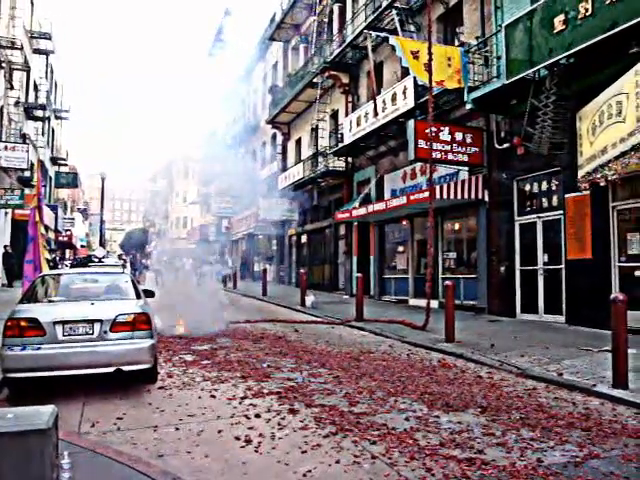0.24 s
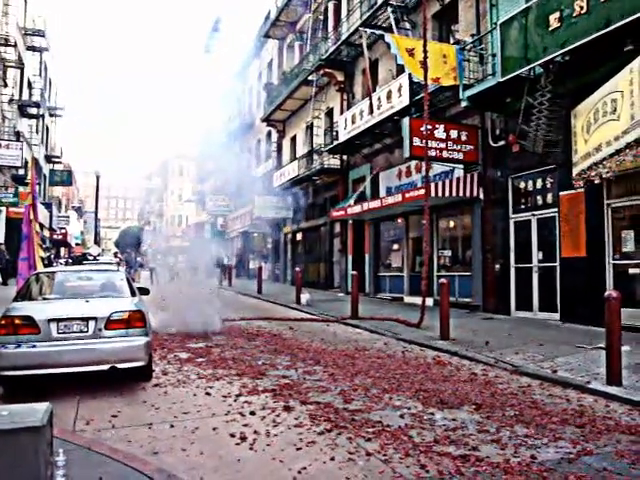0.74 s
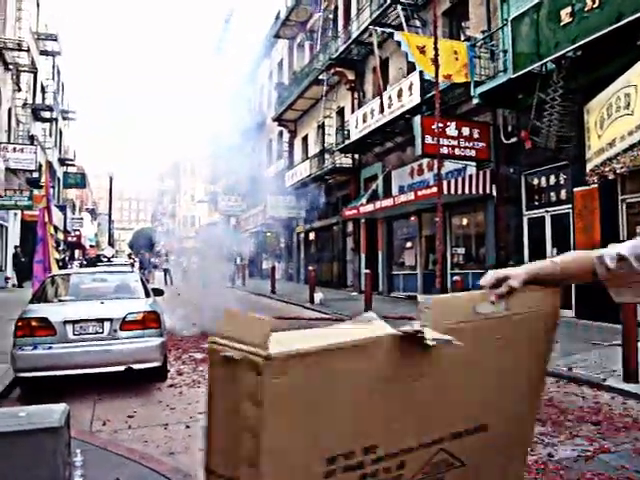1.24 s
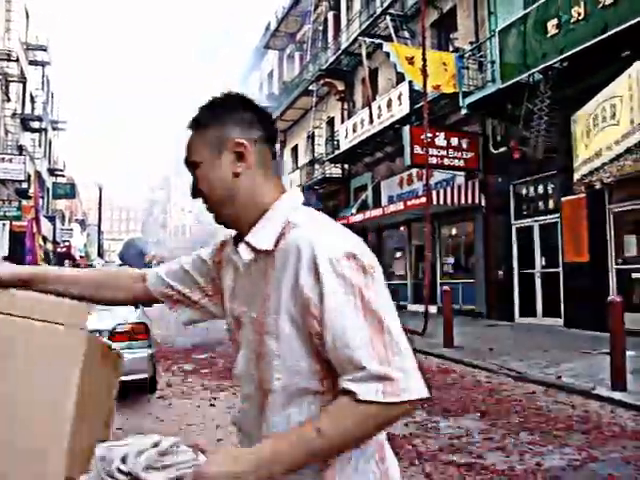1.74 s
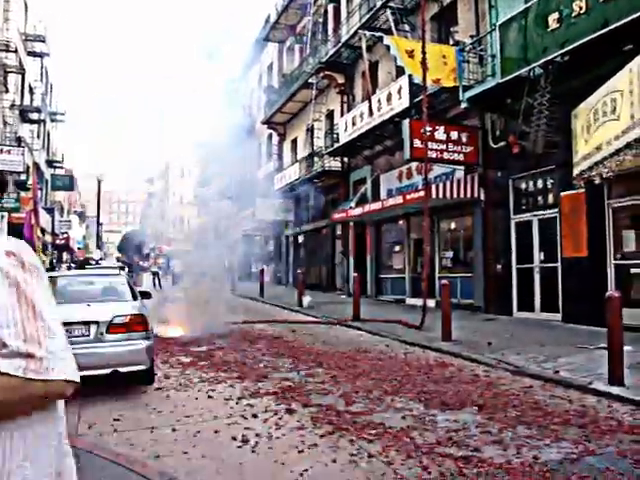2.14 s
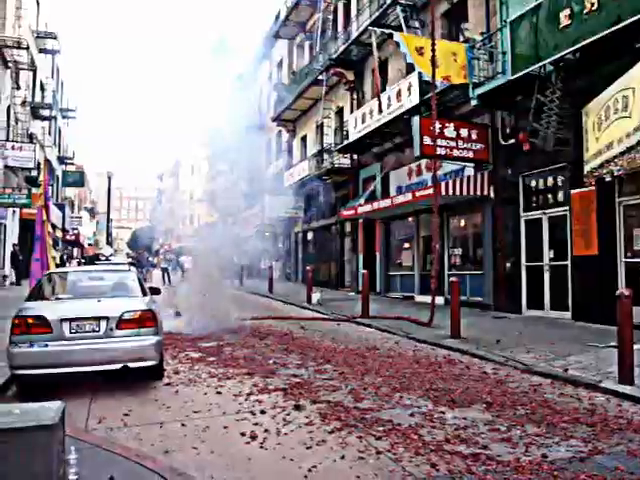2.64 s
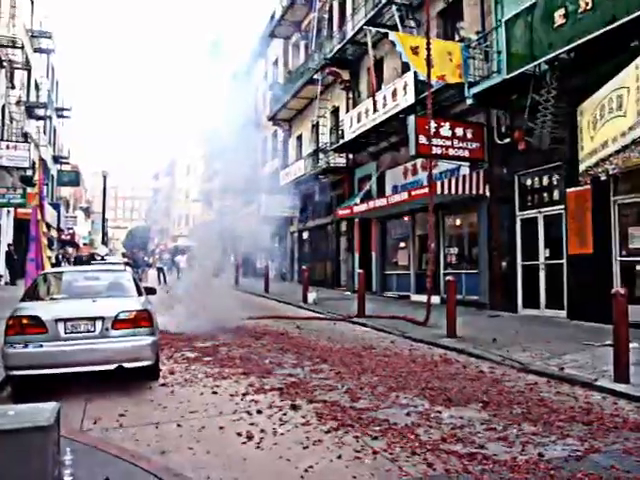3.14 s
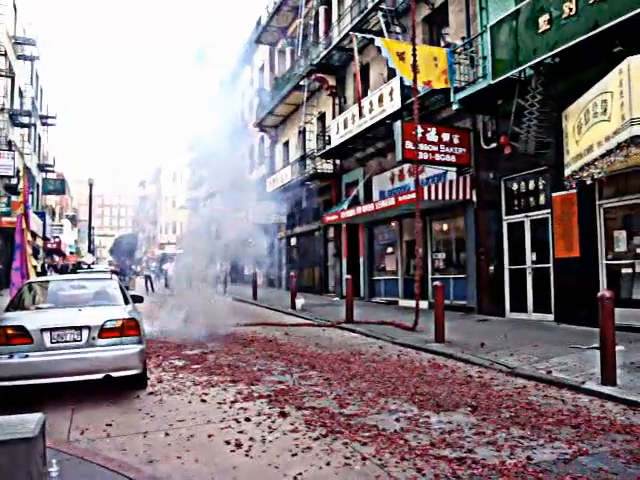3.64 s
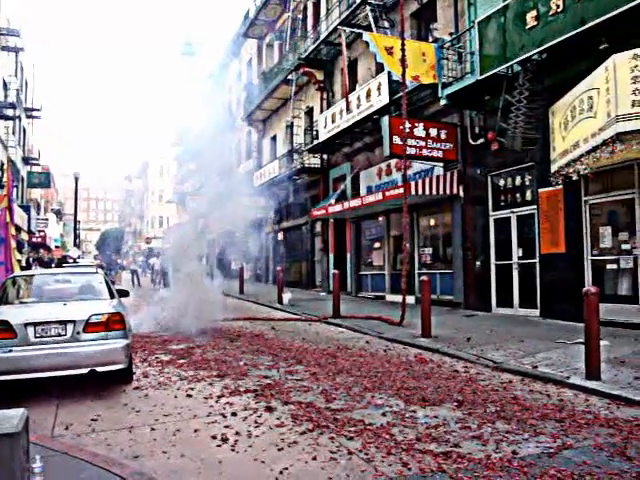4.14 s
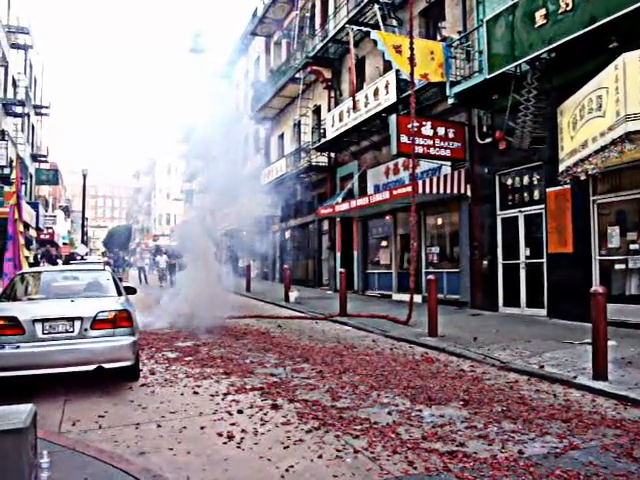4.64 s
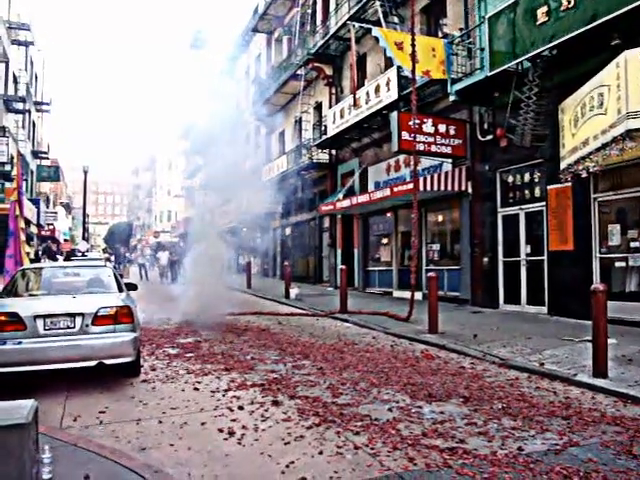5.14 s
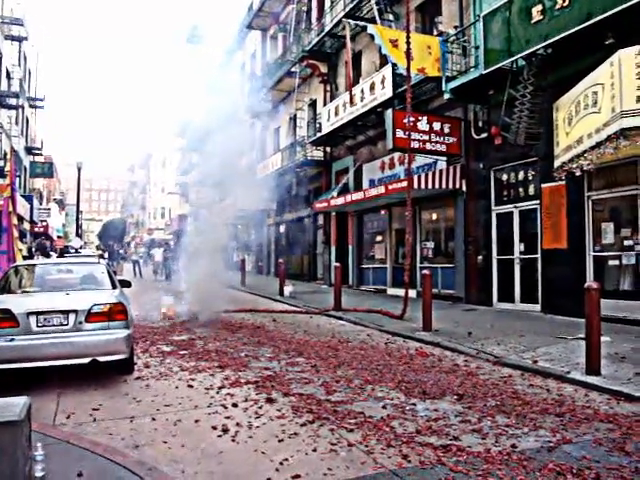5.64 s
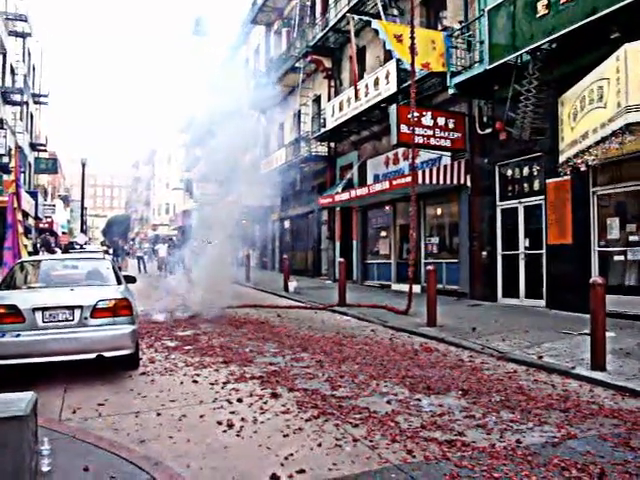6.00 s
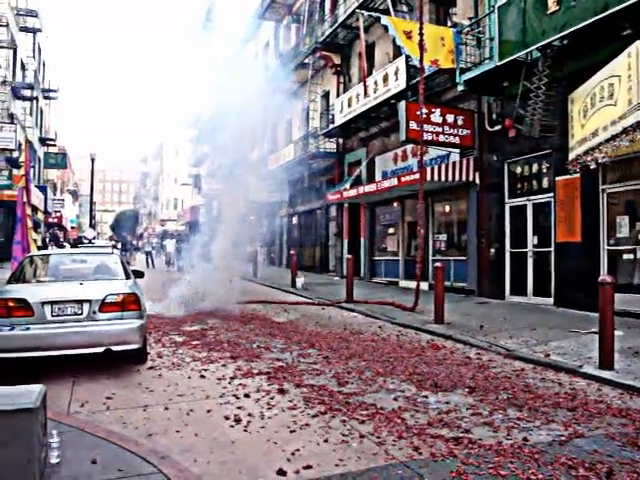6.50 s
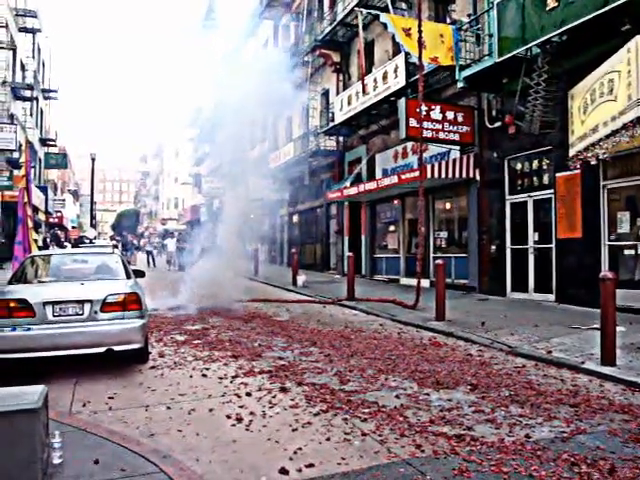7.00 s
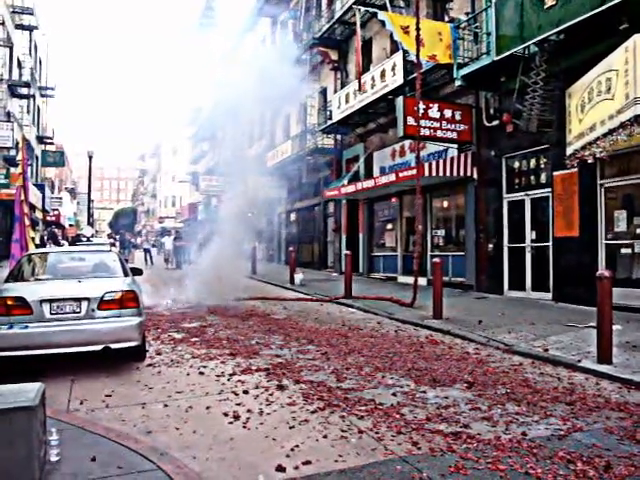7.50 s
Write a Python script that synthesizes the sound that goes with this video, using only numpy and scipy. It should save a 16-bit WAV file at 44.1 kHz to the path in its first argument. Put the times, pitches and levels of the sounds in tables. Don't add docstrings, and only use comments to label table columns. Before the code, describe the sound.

A long string of firecrackers is already burning on a narrow street lined with tall fronts. Sharp cracks and heavier bangs come in fast, uneven flurries, each slapped back by ground and walls and blending into a long ringing roar. Later the bursts separate slightly, letting the echo fall away before the next bang. Faint distant traffic hums behind. A small camera microphone sounds thin in the bass, squashed and clipped on the peaks.

```python
import sys
import numpy as np
from scipy import signal
from scipy.fft import rfft, irfft, next_fast_len
from scipy.io import wavfile
from scipy.ndimage import minimum_filter1d, map_coordinates

SR = 44100
rng = np.random.default_rng(int(sys.argv[2]) if len(sys.argv) > 2 else 0)


def dump(signal):
    limited = np.clip(np.atleast_2d(signal).T, -1, 1)
    pcm = np.round(limited * 32767).astype(np.int16)
    wavfile.write(sys.argv[1], SR, pcm)


def attenuation_scalar(level_db):
    decades = np.asarray(level_db, float) / 20
    return 10 ** decades


N = 342216
LEAD = SR

# [start t/s, end t/s, opening shock level/dB, opening charge level/dB, small crackers' charge level/dB]
FLURRIES = [(.0053, .33, 6, -9, -19.5), (0.419, 0.906, 4, -16, -20), (1.031, 1.05, 3.5, -7.5, -33),
            (1.2128, 1.4, 4, -10, -20.5), (1.6415, 2.09, 4, -14, -17), (2.1556, 2.475, -7, -11.5, -19),
            (2.5393, 2.92, 6, -6.5, -24.5), (3.0452, 3.076, -3, -11.5, -26), (3.1492, 3.39, 0, -9, -22.5),
            (3.453, 3.84, -4.5, -19, -22), (3.9106, 4.03, 7.5, -14, -32), (4.1484, 4.27, 10, -9.5, -37),
            (4.396, 4.42, 2.5, -8, -22.5), (4.7633, 4.9, 3, -6, -19.5), (5.352, 5.419, 8.5, -3, -27),
            (5.467, 5.61, 11, -26.5, -26.5), (5.725, 5.81, 1, -6.5, -16), (5.8839, 6.07, 5.5, -6, -17),
            (6.363, 6.595, -0.5, -14.5, -19.5), (6.671, 6.77, -11, -13.5, -21),
            (7.0342, 7.08, 5.5, -11, -31.5), (7.1924, 7.29, 4, -4.5, -28), (7.3952, 7.43, 9.5, -13, -24),
            (7.5576, 7.76, 7, -14.5, -28.5)]
# [t/s, shock level/dB, charge level/dB]
HEAVY_CRACKERS = [(0.1874, 4, -11.5), (0.504, -5, -8.5), (.5356, -9, -9), (0.733, -21, -13.5),
                  (0.8308, 10, -11), (1.3172, 4.5, -14), (1.4524, 4.5, -9.5), (1.6882, 7, -10.5),
                  (1.8846, -10, -9.5), (1.9641, -3, -12), (2.062, -13.5, -10), (2.4291, -1, -13),
                  (2.6737, -4, -15.5), (2.8205, 1, -17.5), (3.3645, 7, -13.5), (3.3795, -5.5, -9.5),
                  (3.5445, -1, -11), (3.641, -4, -6), (3.7954, 3.5, -10.5), (3.9733, 3.5, -11),
                  (4.2241, 5.5, -13), (4.7761, -1.5, -17), (6.155, -9, -11), (6.223, -10.5, -5),
                  (6.4086, -11, -11), (6.5935, -6, -13.5), (6.7436, 3, -15.5), (7.2017, 10, -20),
                  (7.5655, 8, -8), (7.6862, 0, -7)]
# [t/s, shock level/dB, charge level/dB]
SHARP_CRACKERS = [(0.094, 2.5, -13), (0.2504, 4.5, -20), (.3548, -7, -20), (0.4439, -3, -13),
                  (0.6674, 7.5, -17.5), (1.256, 0, -26), (1.7886, 4.5, -14), (2.323, 6.5, -17),
                  (2.3814, 6, -20.5), (2.6988, 2, -19.5), (2.7676, 3, -18.5), (2.8843, 3.5, -10.5),
                  (3.077, -7.5, -34), (3.2229, 2.5, -12.5), (3.3227, 0.5, -12), (3.4858, -2, -11.5),
                  (3.5936, 1, -26), (4.0539, 6, -13), (4.2659, 2.5, -16.5), (4.8515, 1, -15.5),
                  (5.4777, 3, -8), (5.5124, -7, -35), (5.5562, 10, -10), (5.8294, 1, -20.5),
                  (6.4898, 4.5, -16), (6.5213, -3, -23), (7.2735, 10, -19), (7.4377, -4, -23.5),
                  (7.6193, 4.5, -20), (7.6567, 5.5, -18)]
# [delay t/s, level/dB]
WALLS = [
    (.0022, -16),
    (.0097, -8),
    (.0178, -3),
    (.0214, -5),
    (.0247, -2.5),
    (.027, -8),
    (.031, -5),
    (.0375, -8),
    (.043, -18.5),
]
# [f/Hz, level per Hz/dB]
ROAR_TONE = [(24, -63), (40, -48), (101, -30.5), (321, -18), (387, -8), (523, -3), (690, -4), (890, 0.5),
             (1290, 2), (2410, -1), (5810, -8.5), (9010, -13), (10100, -20), (13200, -68), (22000, -120)]
# [f/Hz, t/s]
STREET_RING = [(150, 1.46), (600, 1.51), (1500, 1.406), (3500, 1.17), (6000, 0.81), (10000, 0.41)]
# [f/Hz, level per Hz/dB]
TOWN_TONE = [(24, -76.5), (40, -46), (444, -19.5), (690, -9), (911, -6.5), (3040, -12.5), (10100, -50),
             (13200, -71), (22000, -120)]

SMALL_PER_S = 42
SMALL_SHOCK_DB, SHOCK_SPREAD_DB, CHARGE_SPREAD_DB = -4.5, 3.2, 3
BOOM_SWING_DB, SNAP_SWING_DB = 2.7, 0.9
TOP_HZ = 10230


def unit(x):
    return x / np.sqrt(np.mean(x ** 2) + 1e-20)


def along(points, hz):
    f, value = np.transpose(points)
    return np.interp(np.log(hz + 1), np.log(f + 1), value)


def filtered(x, response):
    size = next_fast_len(x.shape[-1] + 8192)
    gain = response(np.fft.rfftfreq(size, 1 / SR))
    return irfft(rfft(x, size) * gain, size)[..., :x.shape[-1]]


def drift(rate):
    knots = rng.standard_normal(int(N * rate / SR) + 4)
    return map_coordinates(knots, [np.arange(N) * rate / SR])


def bangs():
    start, end, shock_db, charge_db, small_db = np.transpose(FLURRIES)
    openers = np.c_[start, shock_db, charge_db]
    count = int(N / SR * SMALL_PER_S) - 1
    s = (np.arange(count) + rng.random(count)) / SMALL_PER_S
    luck = rng.standard_normal((count, 2))
    flurry = np.maximum(np.searchsorted(start, s) - 1, 0)
    burning = (s > start[flurry]) & (s < end[flurry])
    lit_db = np.where(burning, 0, -100)
    small_shock_db = lit_db + SMALL_SHOCK_DB + SHOCK_SPREAD_DB * luck[:, 0]
    small_charge_db = lit_db + small_db[flurry] + CHARGE_SPREAD_DB * luck[:, 1]
    small = np.c_[s, small_shock_db, small_charge_db]
    return np.r_[openers, HEAVY_CRACKERS, SHARP_CRACKERS, small]


def shocks(seconds, db, length_s):
    u = np.arange(96) / SR / length_s[:, None]
    wave = -attenuation_scalar(db)[:, None] * (1 - u) * np.exp(-.62 * u)
    at = np.round(seconds * SR).astype(int)[:, None] + np.arange(96)
    return np.bincount(at.ravel(), wave.ravel(), N + SR)[:N]


def straight(lit):
    s, shock_db, charge_db = lit.T
    length_db = .5 * (charge_db + 18) + 1.2 * rng.standard_normal(len(s))
    return shocks(np.abs(s - .00012), shock_db + 3, .00013 * attenuation_scalar(length_db))


def slaps(lit):
    s, _, charge_db = lit.T
    luck = rng.standard_normal((len(s), len(WALLS), 3, 3))
    sound = 0
    for k, (delay, db) in enumerate(WALLS):
        for ledge in range(3):
            shift, size, stretch = luck[:, k, ledge].T
            wall_s = delay * (1 + .012 * luck[:, k, 0, 0])
            late = s + wall_s + .0006 * ledge * np.abs(shift)
            level_db = charge_db + 6.5 + db + 3 * size
            sound = sound + shocks(late, level_db, .00013 * np.exp(.29 * stretch))
    return sound


def tails(count):
    t = np.arange(2 * SR) / SR
    chance = np.clip(1500 * (1 + (t / .08) ** 2) / SR, 0, 1)
    hits = rng.random((count, len(t))) < chance
    grains = hits * rng.standard_normal((count, len(t))) / np.sqrt(chance)
    mixed = 1.79 * grains + rng.standard_normal(grains.shape)
    hz, frame_s, z = signal.stft(mixed, SR, nperseg=256)
    ring_s = along(STREET_RING, hz)[:, None]
    slow = attenuation_scalar(-60 * frame_s / ring_s)
    quick = attenuation_scalar(3.0 - 60 * frame_s / (.17 * ring_s))
    octaves = np.log2((hz[:, None] + 200) / 1500)
    tilt = attenuation_scalar(1.41 * rng.standard_normal((count, 1, 1)) * octaves)
    tail = signal.istft(z * np.hypot(slow, quick) * tilt, SR, nperseg=256)[1][:, :len(t)]
    tail = tail * np.clip((t - .012) / .0034, .25, 1)
    return tail / np.sqrt(np.mean(tail[:, :SR // 10] ** 2))


def roar(lit):
    s, _, charge_db = lit.T
    earlier = -np.linspace(.01, .9, num=24)
    s = np.r_[earlier, s]
    charge_db = np.r_[np.full(len(earlier), -18.5), charge_db]
    answers = tails(count=10)
    blows = np.zeros((len(answers), LEAD + N))
    at = LEAD + np.round(s * SR).astype(int)
    blows[np.arange(len(s)) % len(answers), at] = attenuation_scalar(charge_db)
    size = next_fast_len(LEAD + N + 2 * SR)
    spectrum = np.sum(rfft(blows, size) * rfft(answers, size), axis=0)
    wet = irfft(spectrum, size)[LEAD:LEAD + N]
    colour = attenuation_scalar(along(ROAR_TONE, np.fft.rfftfreq(4096, 1 / SR)))
    toned = filtered(wet, lambda hz: attenuation_scalar(along(ROAR_TONE, hz)))
    return attenuation_scalar(-6.5) * toned / np.sqrt(np.mean(colour ** 2))


def coloured(x):
    boom = filtered(x, lambda hz: 1 / (1 + (hz / 600) ** 4))
    snap = filtered(x, lambda hz: 1 - 1 / (1 + (hz / 2200) ** 4))
    boom_db = BOOM_SWING_DB * drift(6)
    snap_db = SNAP_SWING_DB * drift(6)
    return x + boom * (attenuation_scalar(boom_db) - 1) + snap * (attenuation_scalar(snap_db) - 1)


def town():
    noise = filtered(rng.standard_normal(N), lambda hz: attenuation_scalar(along(TOWN_TONE, hz)))
    return attenuation_scalar(-27.5) * unit(noise)


def capsule(hz, low_hz, high_hz):
    low, high = 1j * hz / low_hz, 1j * hz / high_hz
    bass_cut = low ** 2 / (low ** 2 + low + 1)
    return bass_cut / (high ** 2 + 1.4 * high + 1)


def ducked(x, top, recover_s):
    fade = np.exp(-1 / (recover_s * SR))
    pull = signal.lfilter([1], [1, -fade], np.maximum(np.abs(x) - top, 0))
    return x / (1 + .9 * np.tanh(.3 * np.roll(pull, 12)))


def overloaded(x):
    top = np.where(x > 0, .72, 1)
    return x / (1 + np.abs(x / top) ** 5) ** (1 / 5)


def starved(x, size, count, depth_db, slope_db):
    hz, _, z = signal.stft(x, SR, nperseg=size)
    hz, power = hz[:-1, None], np.abs(z[:-1]) ** 2
    band = power.reshape(len(hz) // count, count, -1).mean(axis=1)
    band = np.repeat(band, count, axis=0)
    peak = -minimum_filter1d(-band, size=2560 // size, axis=1)
    limit = peak * attenuation_scalar(depth_db + slope_db * hz / 1000) ** 2
    keep = (band > limit) | (hz < 4200)
    return signal.istft(z * np.r_[keep, keep[:1]], SR, nperseg=size)[1][:N]


def scene():
    lit = bangs()
    shock = filtered(straight(lit), lambda hz: capsule(hz, low_hz=930, high_hz=6900))
    slap = filtered(slaps(lit), lambda hz: capsule(hz, low_hz=730, high_hz=4100))
    street = attenuation_scalar(-2.5) * coloured(slap + roar(lit))
    return (shock + street + town())[None]


def top_cut(x):
    return signal.sosfilt(signal.butter(12, 10270, fs=SR, output="sos"), x)


def record(dry):
    x = ducked(dry[0], top=.85, recover_s=.009)
    x = overloaded(x)
    x = filtered(x, lambda hz: (hz < TOP_HZ) * hz / np.hypot(hz, 150))
    x = starved(x, size=256, count=4, depth_db=-14.3, slope_db=.55)
    x = starved(x, size=768, count=8, depth_db=-10, slope_db=.55)
    x = np.clip(x, -.86, .86)
    return top_cut(x[None])


dry = scene()
out = record(dry)
dump(out)
```